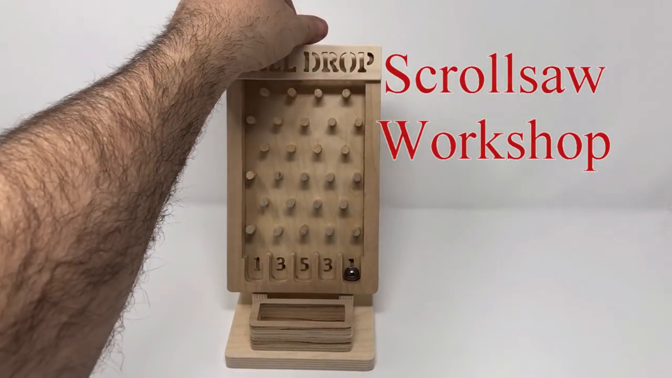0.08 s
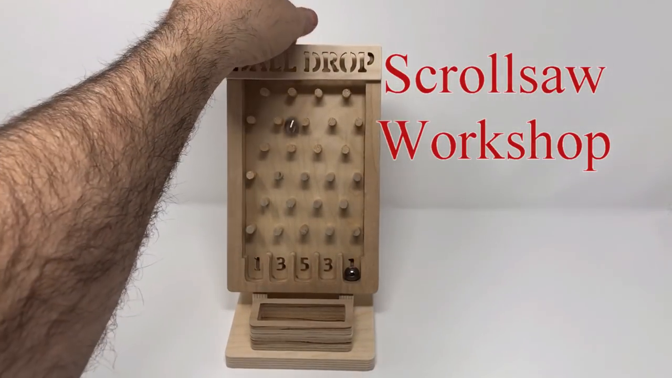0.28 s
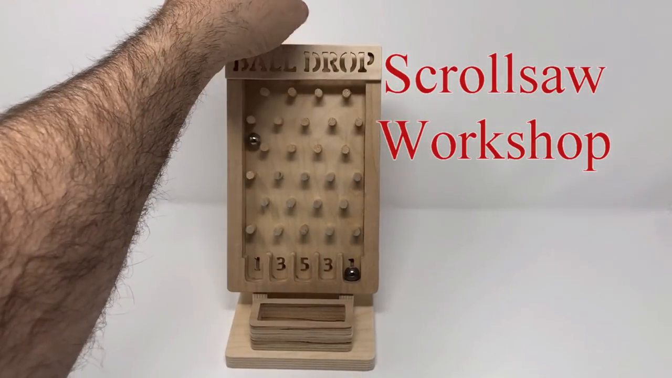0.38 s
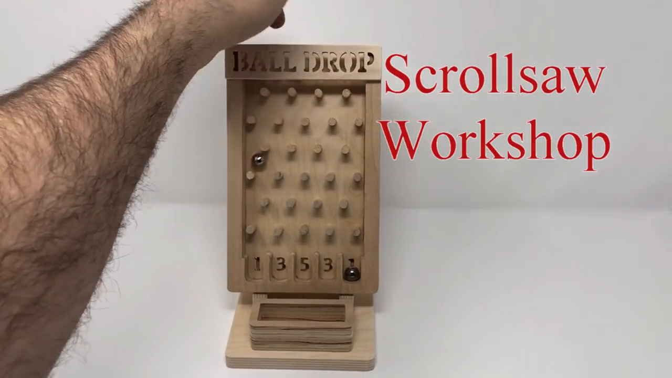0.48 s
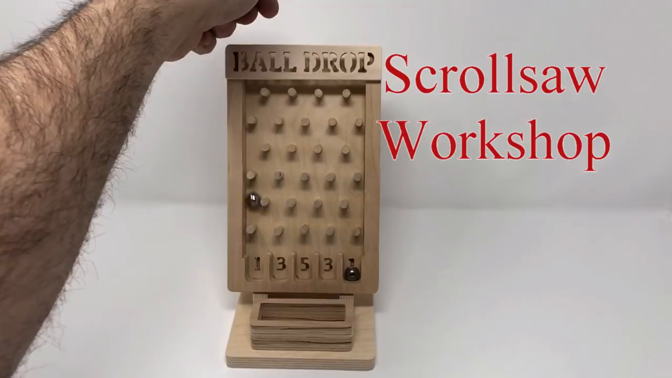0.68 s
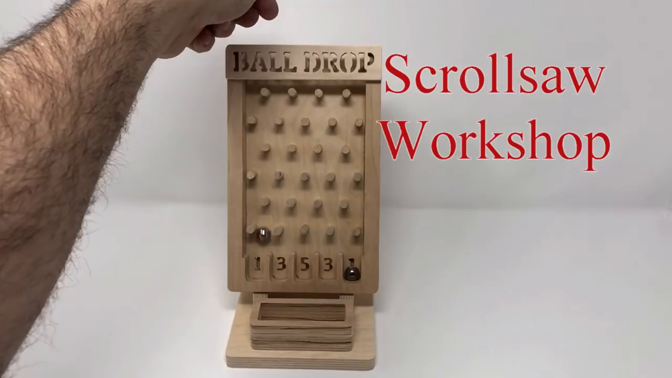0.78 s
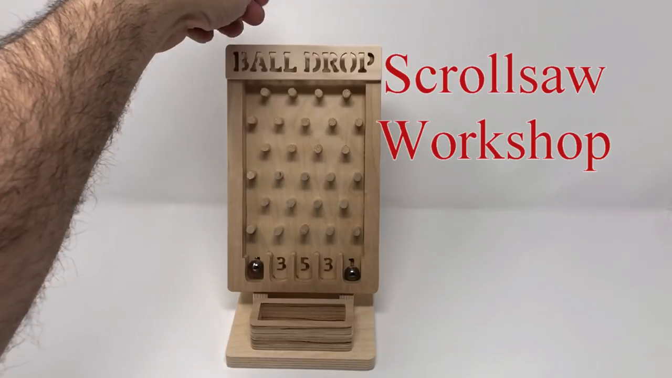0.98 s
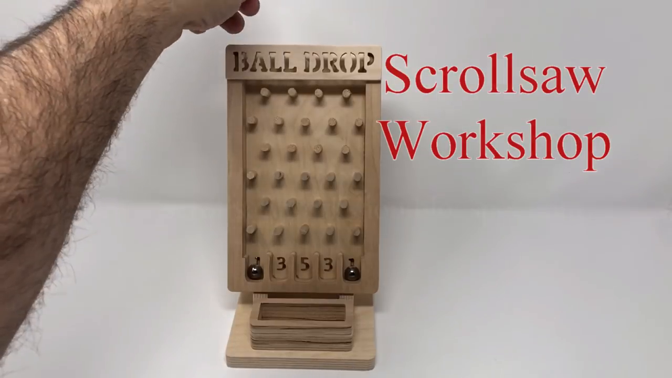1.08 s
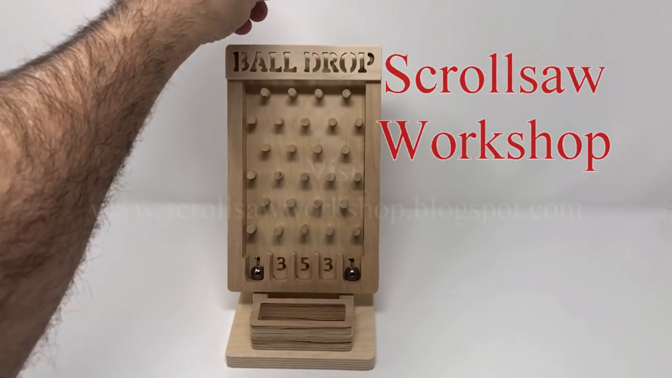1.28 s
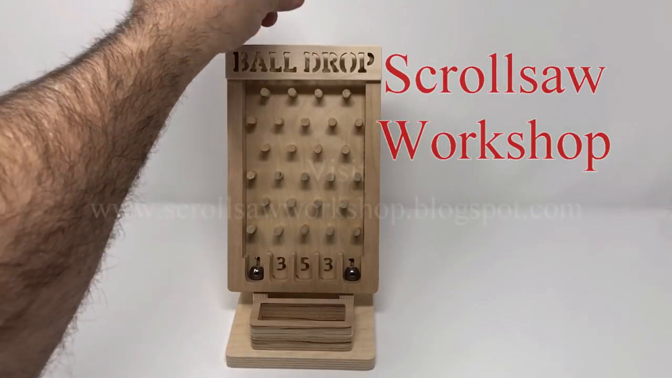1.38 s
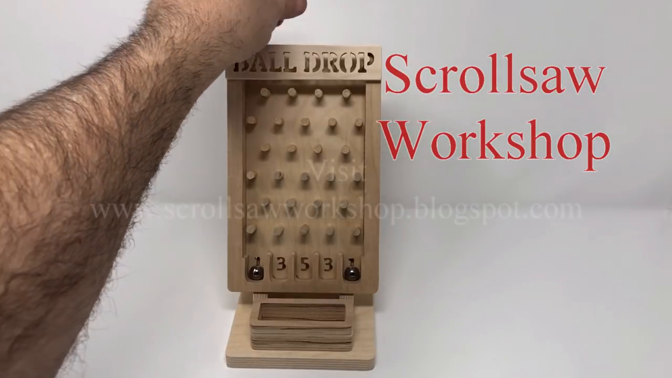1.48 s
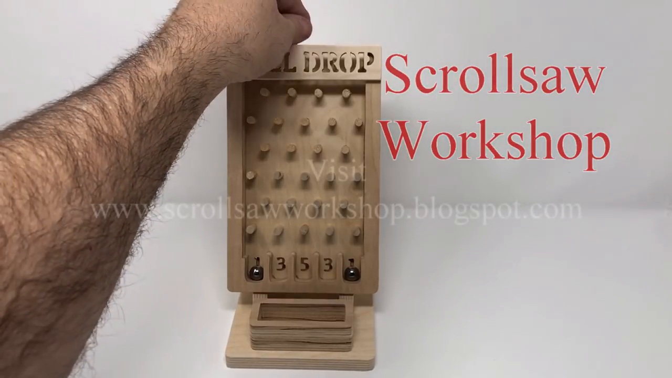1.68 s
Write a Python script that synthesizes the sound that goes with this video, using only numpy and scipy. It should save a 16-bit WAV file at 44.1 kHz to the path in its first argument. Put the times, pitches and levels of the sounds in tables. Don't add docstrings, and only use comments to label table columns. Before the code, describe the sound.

A small steel ball clatters down a wooden peg board, close up in a quiet room. Faint finger rubbing until 0.24 s, then the ball slips off and knocks irregularly from peg to peg, the thin panel ringing hollow and the stand thudding dully. Brightest hits come at 0.9 s and the 1.05 s slot landing; rapidly shrinking bounces end by 1.25 s, leaving faint low rumble until 1.7 s.

```python
import sys
import numpy as np
from scipy import signal
from scipy.fft import rfft, irfft
from scipy.io import wavfile
from scipy.ndimage import map_coordinates

SR = 44100
rng = np.random.default_rng(int(sys.argv[2]) if len(sys.argv) > 2 else 0)


def unload_wav(signal):
    wavfile.write(
        sys.argv[1],
        SR,
        np.round(np.clip(np.atleast_2d(signal).T, -1, 1) * 32767).astype(np.int16),
    )


def elevation(decibels):
    levels = np.asarray(decibels, float)
    return 10 ** (levels / 20)


N = 74970


def along(points, hz):
    f, value = np.transpose(points)
    return np.interp(np.log(hz + 1), np.log(f + 1), value)


def curve(rows):
    s, level = np.transpose(rows)
    return np.interp(np.arange(N) / SR, s, level)


def noise(spectrum, size):
    hz = np.fft.rfftfreq(size, 1 / SR)
    inside = (hz >= spectrum[0][0]) & (hz <= spectrum[-1][0])
    white = rfft(rng.standard_normal(size))
    x = irfft(white * elevation(along(spectrum, hz)) * inside, size)
    return x / np.sqrt(np.mean(x ** 2))


def wobble(rate):
    knots = rng.standard_normal(int(N * rate / SR) + 4)
    return map_coordinates(knots, [np.arange(N) * rate / SR])


def swell(t, rise_s, t60):
    return (1 - np.exp(-t / rise_s)) * elevation(-60 * t / t60)


# f/Hz, level/dB (per Hz)
AIR_COLOUR = [(65, -43.5), (110, -10), (283, -14.5), (348, -5), (394, -22.5), (514, -17), (558, -26),
              (606, -29.5), (15000, -44.5)]
# t/s, level/dB
RUMBLE_LEVEL = [(0.0, -62), (0.094, -67), (0.174, -43.5), (0.388, -46.5), (0.42, -42), (0.468, -53),
                (0.606, -50.5), (0.676, -63), (0.738, -42.5), (0.794, -51), (0.838, -40), (0.898, -52),
                (0.932, -42.5), (0.97, -54), (1.088, -47), (1.112, -54.5), (1.572, -59.5), (1.7, -43.5)]
# f/Hz, level/dB (per Hz)
RUMBLE_COLOUR = [(36, -27.5), (50, -26), (64, -3.5), (80, -12.5), (100, -13), (140, -33)]


def workshop():
    air = elevation(-60 + 1.5 * wobble(12)) * noise(AIR_COLOUR, N)
    rumble = elevation(curve(RUMBLE_LEVEL) + 0.8 * wobble(15)) * noise(RUMBLE_COLOUR, N)
    return air + rumble


# t/s, level/dB
RUB_LEVEL = [
    (0.0, -62),
    (0.042, -64.5),
    (0.068, -72),
    (0.128, -57),
    (0.178, -62),
    (0.236, -58),
    (0.24, -36.5),
]
# f/Hz, level/dB (per Hz)
RIM_COLOUR = [(400, -21.5), (750, 2.5), (1000, -1.5), (1275, 3.5), (1450, -4), (1660, -4), (2200, -16.5),
              (4000, -12), (9000, -29)]


def rub():
    level = curve(RUB_LEVEL + [(0.3, -91.5)])
    return elevation(level + 2.5 * wobble(90)) * noise(RIM_COLOUR, N)


def ring(modes, t, rise_s, scatter_db):
    hz, db, t60 = np.transpose(modes)[:, :, None]
    gain = elevation(db + scatter_db * rng.standard_normal(hz.shape))
    steps = rng.standard_normal((len(hz), len(t)))
    line_width = 0.012 * hz
    drift = np.cumsum(steps, axis=1) * np.sqrt(2 * np.pi * line_width / SR) * (hz / 3000)
    phase = 2 * np.pi * (hz * t + rng.random(hz.shape)) + drift
    fade_s = np.minimum(t60, 160 / hz)
    tones = gain * swell(t, rise_s, fade_s) * np.sin(phase)
    return tones.sum(axis=0) * np.linalg.norm(elevation(db)) / np.linalg.norm(gain)


# f/Hz, t60/s
ROOM_FADE = [(200, .2), (1000, .12), (2300, .19), (4000, .27), (12000, .2)]


def tail():
    hz, t, z = signal.stft(rng.standard_normal(SR // 3), SR, nperseg=256)
    fade = elevation(-60 * t / along(ROOM_FADE, hz)[:, None])
    echo = signal.istft(z * fade, SR, nperseg=256)[1]
    return np.pad(echo / np.linalg.norm(echo), (200, 0))


# f/Hz, level/dB, t60/s
PANEL_TONES = [(728, -1.5, .22), (790, -8, .05), (910, -2, .11), (975, -6, .06), (1060, -5, .08),
               (1155, -7, .08), (1272, -7, .08)]
LAYER_LEVELS = (-10, 0, -0.5, -2.5)


def contacts(rows, edge, struck, colour, rise_s=0.00053, scatter_db=2):
    out, t = np.zeros(N + SR), np.arange(SR // 4) / SR
    for s, *db in rows:
        panel, around, part, tick = elevation(np.array(db) + LAYER_LEVELS)
        hit = tick * noise(colour, len(t)) * swell(t, 0.00045, 0.04)
        hit = hit + panel * ring(PANEL_TONES, t, 0.00098, scatter_db)
        hit = hit + around * ring(edge, t, rise_s, scatter_db)
        hit = hit + part * ring(struck, t, rise_s, scatter_db)
        wet = elevation(-12) * signal.fftconvolve(hit, tail())
        wet[:len(t)] += hit
        start = round(s * SR)
        out[start:][:len(wet)] += wet[:len(out) - start]
    return out[:N]


# t/s, panel level/dB, frame level/dB, peg
# level/dB, tick level/dB
PEG_CONTACTS = [(0.246, -3, -17, -17.5, -44), (0.27, -12.5, -37.5, -45, -32), (0.29, -8.5, -29, -41.5, -44.5),
                (0.377, -29, -35.5, -61, -73.5), (0.393, -7, -21, -26, -29), (0.45, -4, -19, -56, -31),
                (0.475, -3.5, -24.5, -42.5, -59), (0.489, -16, -37.5, -33.5, -40.5),
                (0.515, -29, -36.5, -52.5, -68), (0.57, -13, -20, -25, -21.5),
                (0.595, -25.5, -32, -40.5, -42.5), (0.648, -7.5, -41, -42.5, -60),
                (0.668, -26.5, -30.5, -38, -31), (0.705, -12.5, -21, -38, -17.5),
                (0.811, -6, -13.5, -21, -14), (0.835, -12, -26, -29, -44.5),
                (0.877, -12, -20.5, -32.5, -35.5),
                (.314, -15.5, -40.5, -44, -56), (.3255, -38, -35, -42, -28.5), (.3295, -7, -33, -52, -33),
                (.4605, -11, -26.5, -28.5, -25.5), (.616, -28.5, -41, -63, -56), (.722, -54, -28, -27, -88),
                (.9605, -22.5, -34, -18, -25.5), (1.0409, -47, -50, -38, -57),
                (1.255, -55, -35, -44, -73.5), (1.351, -37, -57, -58, -76), (1.405, -53.5, -55, -52.5, -53)]
# f/Hz, level/dB, t60/s
FRAME_TONES = [(1447, -1.5, 0.025), (1657, 0.5, 0.044), (1731.7, -2, 0.035), (1813, -10, 0.21),
               (2090, -11, 0.089), (2303, -2, 0.018)]
# f/Hz, level/dB, t60/s
PEG_TONES = [(2660, -9.5, 0.14), (2876, -10, 0.039), (2830, -15.5, 0.14), (3126, -8.5, 0.042),
             (3513, -6.5, 0.034), (3836, -3.5, 0.034), (4170, -5, .05), (4487, -7.5, .04),
             (5354, -15, 0.024)]
# f/Hz, level/dB (per Hz)
TICK_COLOUR = [(1500, -22), (3000, 3.5), (5000, -3), (6300, 0), (7700, 1.5), (9300, -7.5), (11000, -20),
               (15000, -29.5)]


def upper_pegs():
    return contacts(PEG_CONTACTS, FRAME_TONES, PEG_TONES, TICK_COLOUR)


# t/s, knock level/dB, boom level/dB
BASE_JOLTS = [(0.249, -31.5, -47), (0.328, -34.5, -72), (0.393, -23.5, -28), (0.454, -28, -56),
              (0.571, -25, -58), (0.629, -31.5, -88), (0.708, -26, -42.5), (0.771, -38.5, -50.5),
              (0.812, -23.5, -48), (0.904, -22, -57), (0.978, -31.5, -45.5), (1.053, -22, -50),
              (1.125, -26.5, -77), (1.167, -28.5, -69), (1.202, -32.5, -56), (1.234, -37, -47)]
# f/Hz, level/dB (per Hz)
KNOCK_COLOUR = [(110, 2.5), (150, -6), (195, -1.5), (260, -4.5), (330, 1.5), (520, -2.5), (620, -25.5)]


def base():
    out, t = np.zeros(N + SR), np.arange(SR // 3) / SR
    knock_rise_s = 0.0038
    for s, knock_db, boom_db in BASE_JOLTS:
        knock = elevation(knock_db - 9) * noise(KNOCK_COLOUR, len(t)) * swell(t, knock_rise_s, 0.2)
        leg = elevation(knock_db - 0.5) * np.sin(2 * np.pi * 198.8 * t) * swell(t, knock_rise_s, 0.054)
        boom = elevation(boom_db - 3) * np.sin(2 * np.pi * 75 * t) * swell(t, 0.015, 0.25)
        out[round(s * SR):][:len(t)] += knock + leg + boom
    return out[:N]


# t/s, panel level/dB, rail level/dB, peg level/dB, tick level/dB
SIDE_KNOCKS = [
    (0.63, -7.5, -20.5, -20, -27),
    (0.768, -12.5, -16.5, -43.5, -58.5),
    (0.863, -9.5, -16.5, -16.5, -20.5),
    (0.935, -9, -17.5, -39.5, -43.5),
    (0.978, -15.5, -12.5, -26.5, -56),
    (1.012, -21, -23.5, -40, -51),
]
# f/Hz, level/dB, t60/s
RAIL_TONES = [(1730, -7, .05), (2000, -10, .04), (2310, 0, .045)]
# f/Hz, level/dB, t60/s
OUTER_PEG_TONES = [(2900, -9, .04), (3600, -9, .03), (4160, 0, .04)]


def side_rail():
    return contacts(SIDE_KNOCKS, RAIL_TONES, OUTER_PEG_TONES, TICK_COLOUR)


# t/s, panel level/dB, frame level/dB, peg level/dB, tick level/dB
LOWER_HITS = [
    (0.901, -9, -9, -6, -13.5),
    (0.993, -15.5, -24, -20.5, -26.5),
    (1.108, -11, -36.5, -41, -67),
    (1.149, -41.5, -39.5, -56.5, -65.5),
]
# f/Hz, level/dB (per Hz)
CLACK_COLOUR = [(1500, -24.5), (3000, -3), (5500, 11.5), (7500, -2.5), (9500, 3.5), (12000, -8),
                (14500, -6.5), (15500, -31.5)]


def lower_pegs():
    return contacts(LOWER_HITS, FRAME_TONES, PEG_TONES, CLACK_COLOUR)


# t/s, panel level/dB, divider level/dB, slot level/dB, tick level/dB
SLOT_LANDING = (1.0525, -6.5, -10, -3, -9.5)
BOUNCE_LOSS = (5.7, 3.5, 5.1, 8.9)
# f/Hz, level/dB, t60/s
DIVIDER_TONES = [(1680, -2, .045), (1900, -9, .04), (2240, 0, .045)]
# f/Hz, level/dB, t60/s
SLOT_TONES = [(2840, -4, .055), (3050, -4, .07), (3400, -5, .035), (3880, -4, .03), (4140, 0, .035),
              (4500, -4, .03)]


def slot():
    first_flight_s, shrink = 0.0705, 0.655
    landing_s, *levels = SLOT_LANDING
    bounces = []
    for k in range(7):
        s = landing_s + first_flight_s * (1 - shrink ** k) / (1 - shrink)
        bounces.append((s, *(np.array(levels) - k * np.array(BOUNCE_LOSS))))
    return contacts(bounces, DIVIDER_TONES, SLOT_TONES, CLACK_COLOUR, rise_s=0.00067, scatter_db=2 / 3)


# t/s, level/dB
GATE_LEVEL = [
    (0, -3),
    (.245, 2),
    (1.256, -4.5),
    (1.27, -10.5),
    (1.33, -9.5),
    (1.7, -23),
]


def gate(board):
    return board * elevation(curve(GATE_LEVEL))


def scene():
    board = upper_pegs() + base() + side_rail() + lower_pegs() + slot()
    return (gate(board) + rub() + workshop())[None]


def band_limit(x):
    return signal.sosfilt(signal.butter(12, 16500, fs=SR, output="sos"), x)


def record(dry):
    soft = dry / (1 + np.abs(dry / 0.85) ** 4) ** (1 / 4)
    hz = np.fft.rfftfreq(N, 1 / SR)
    edge = np.where(hz > 15000, elevation(-14), 1) * (hz < 16500)
    mix = irfft(rfft(soft) * edge, N)
    return band_limit(mix)


dry = scene()
out = record(dry)
unload_wav(out)
```